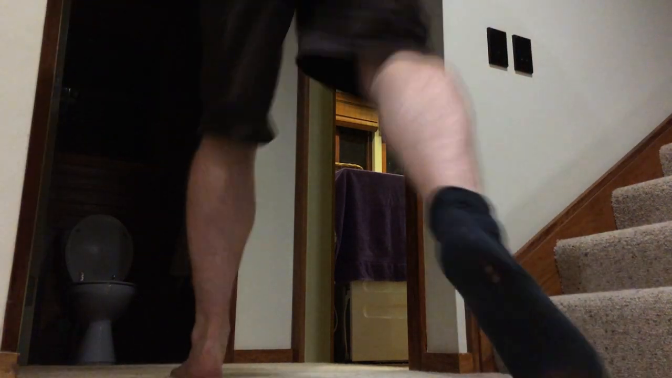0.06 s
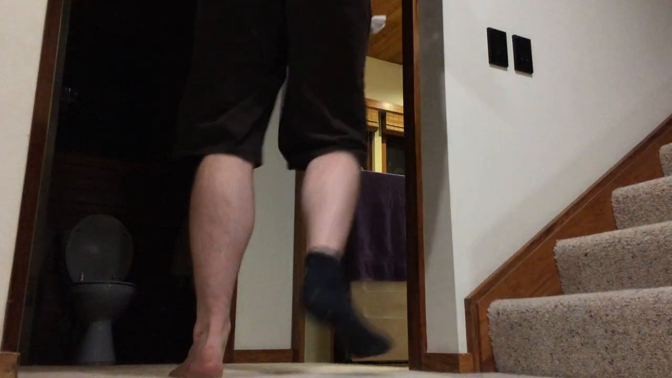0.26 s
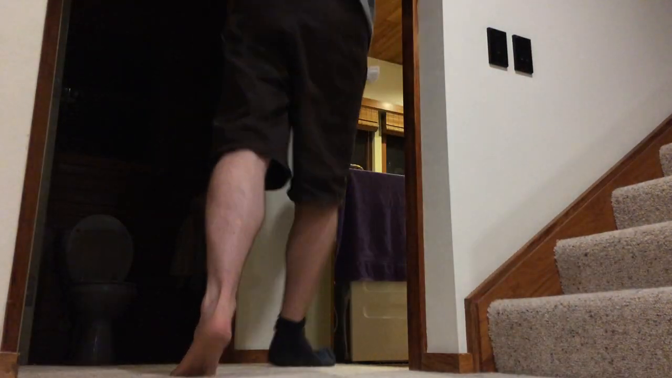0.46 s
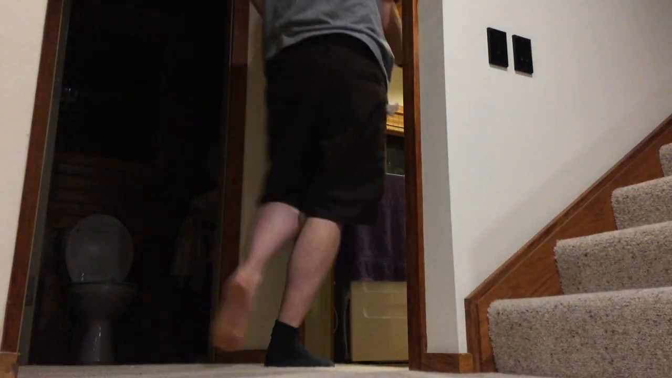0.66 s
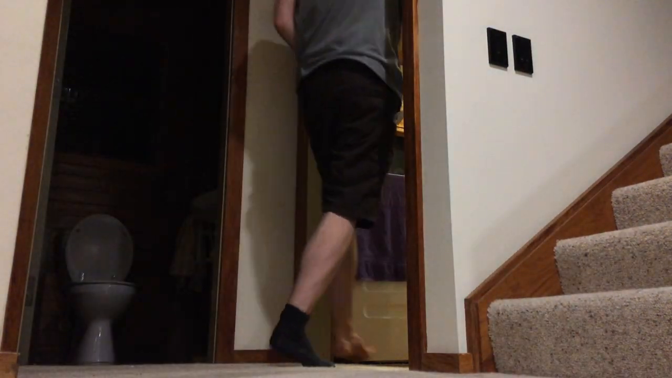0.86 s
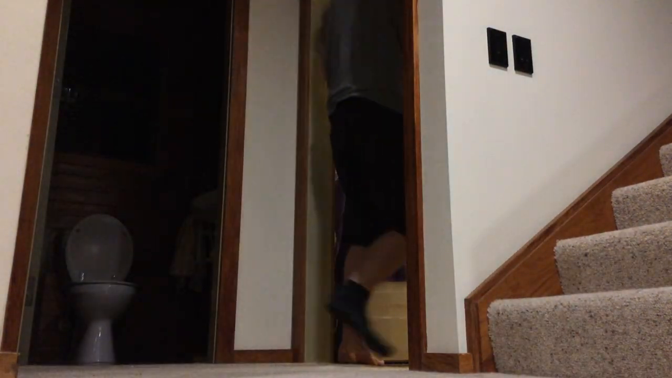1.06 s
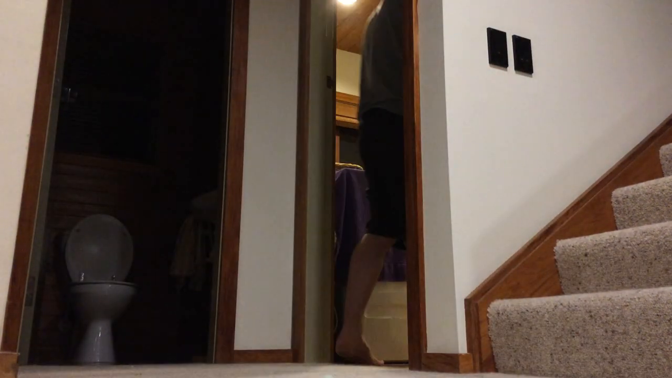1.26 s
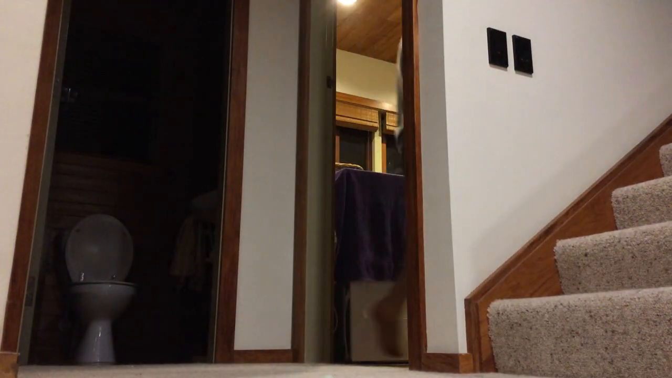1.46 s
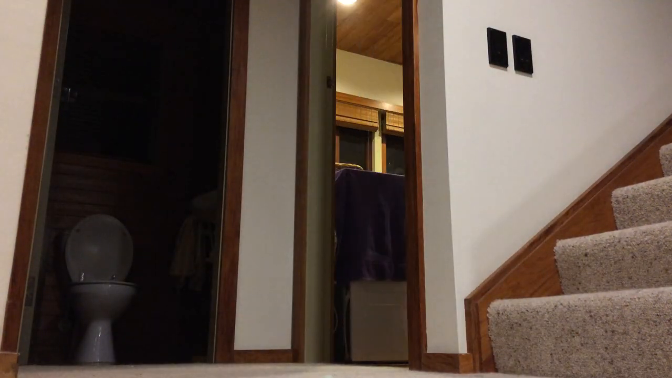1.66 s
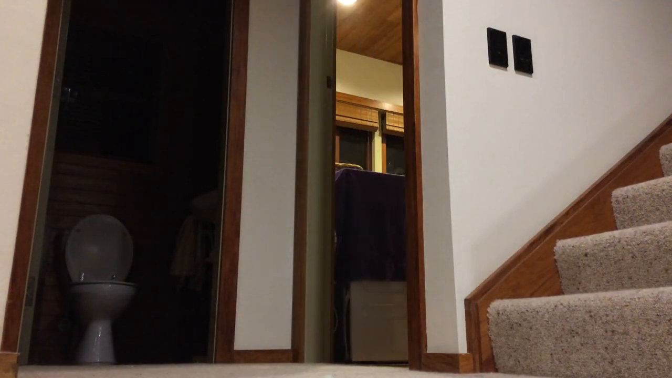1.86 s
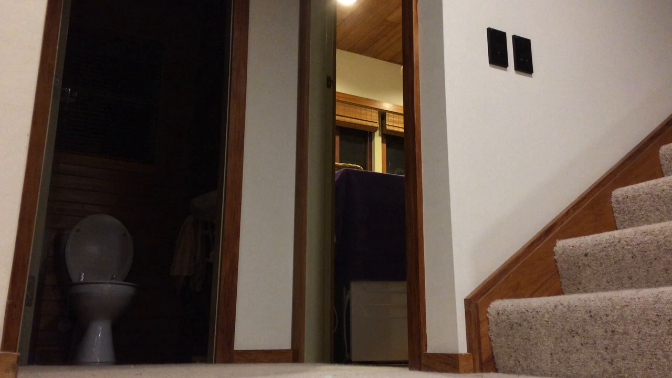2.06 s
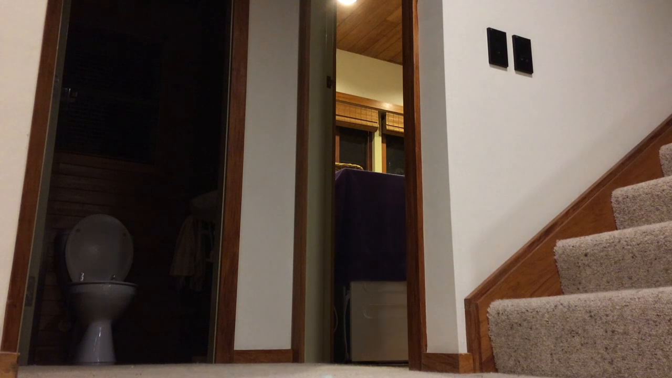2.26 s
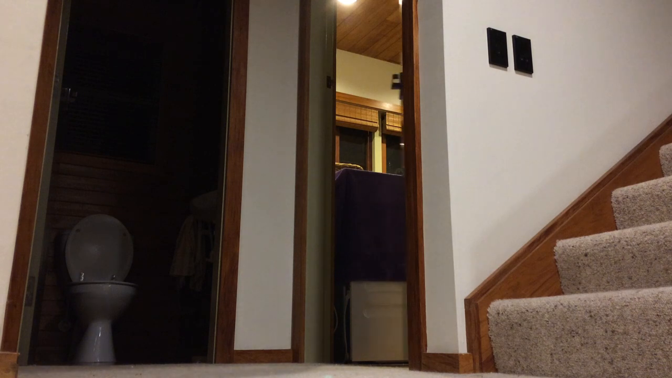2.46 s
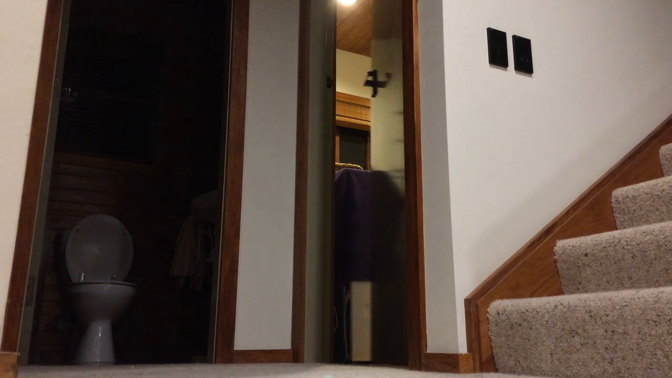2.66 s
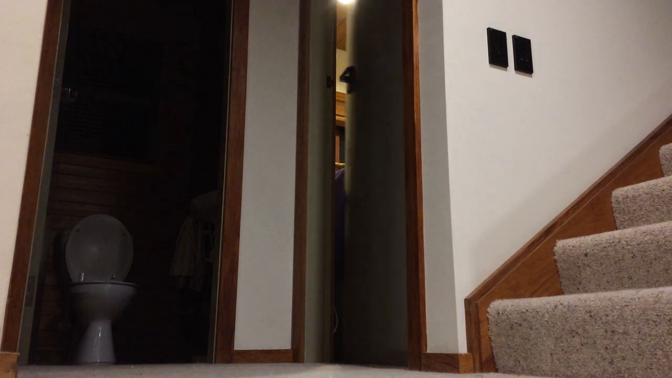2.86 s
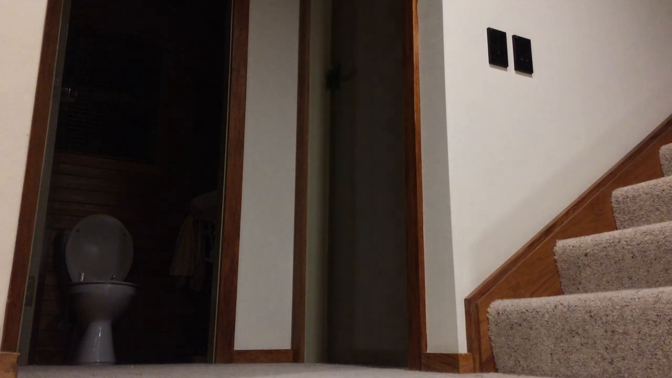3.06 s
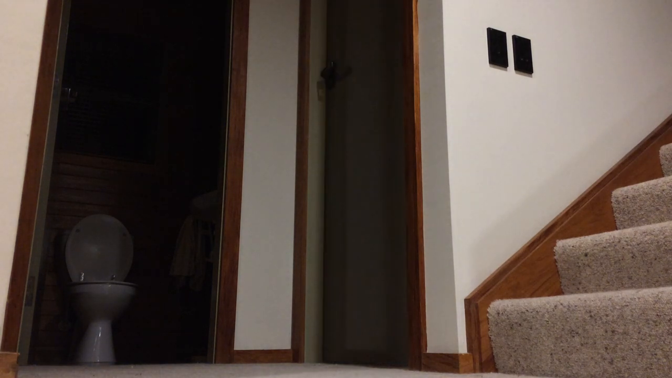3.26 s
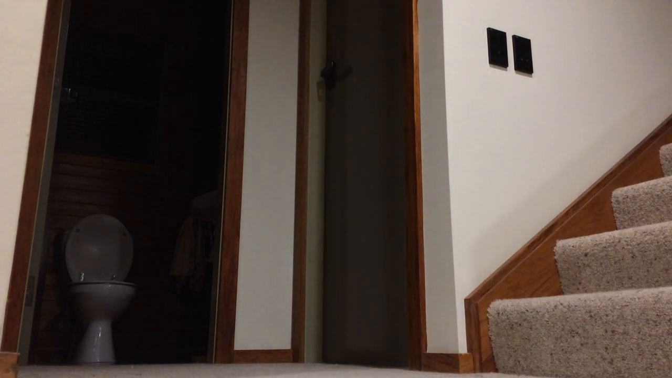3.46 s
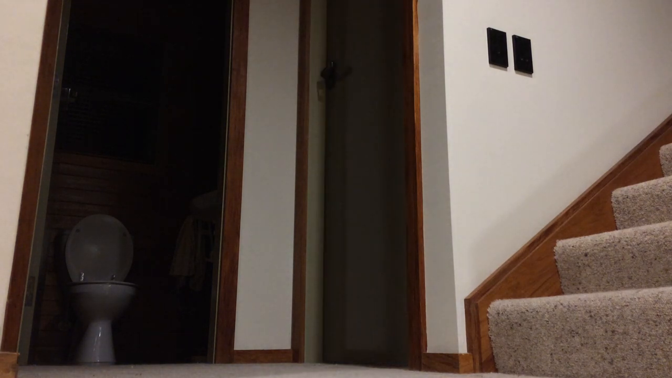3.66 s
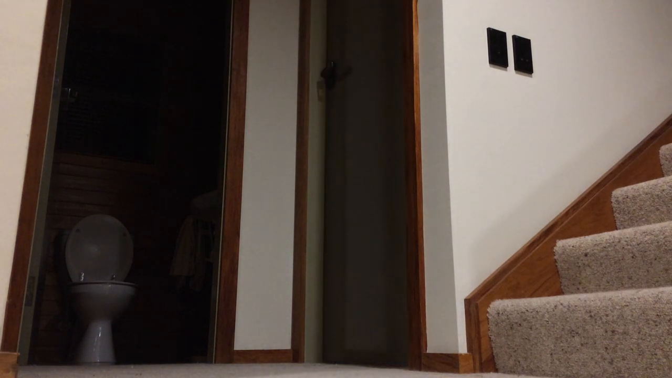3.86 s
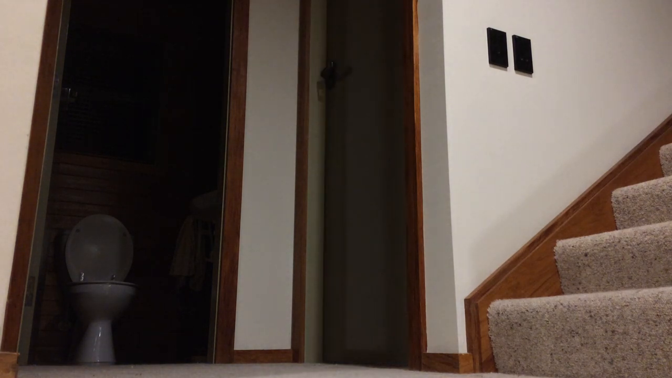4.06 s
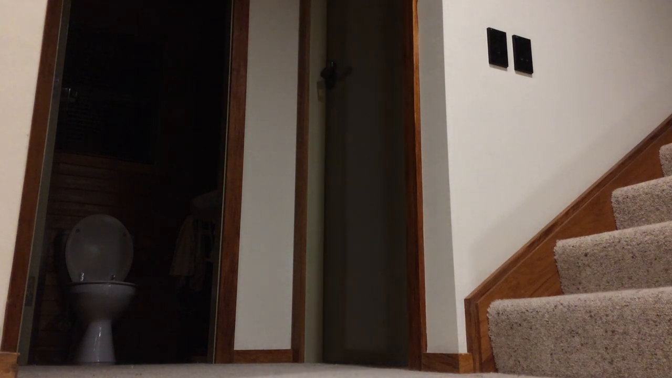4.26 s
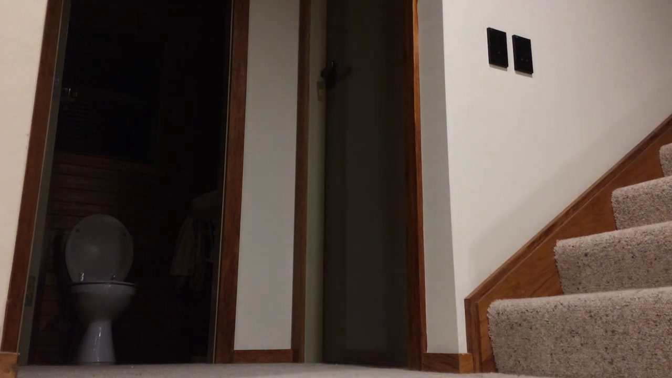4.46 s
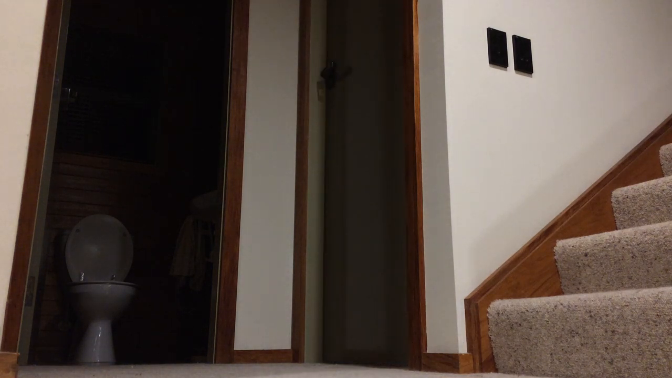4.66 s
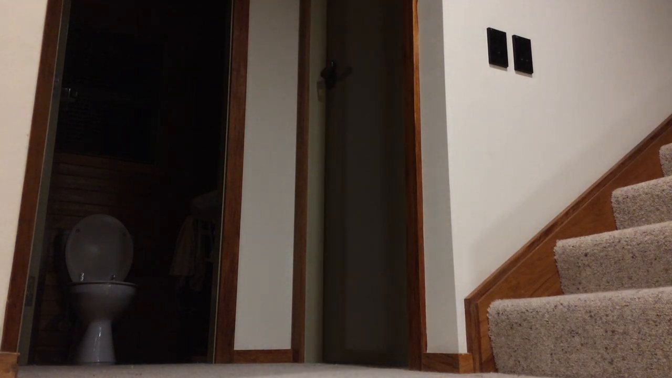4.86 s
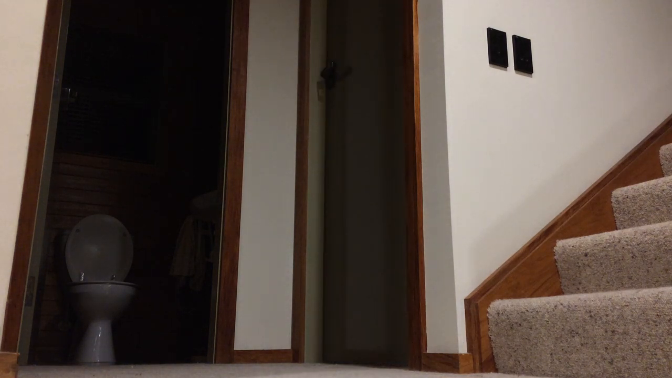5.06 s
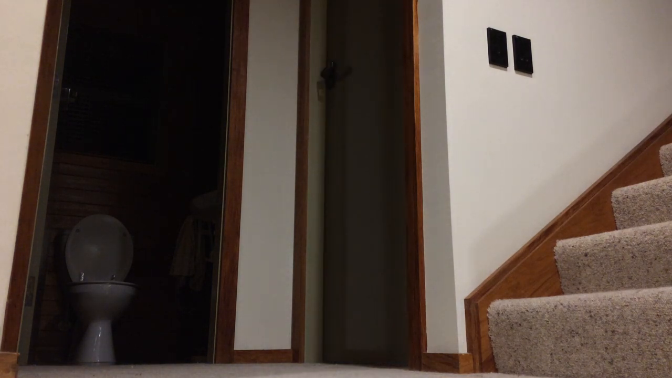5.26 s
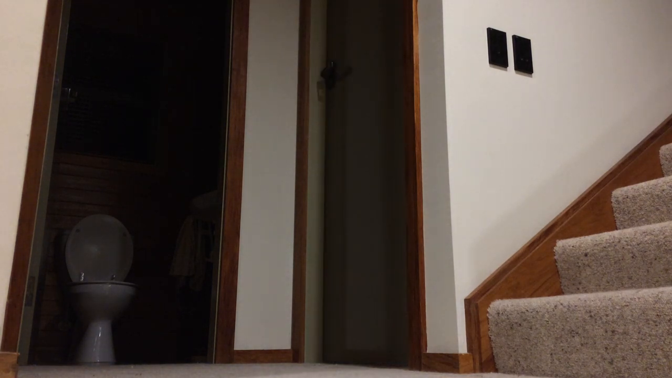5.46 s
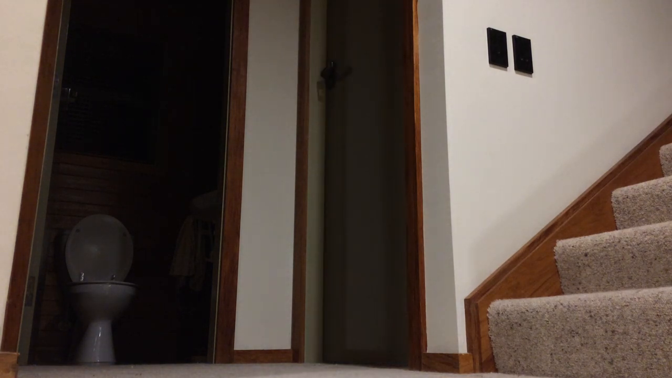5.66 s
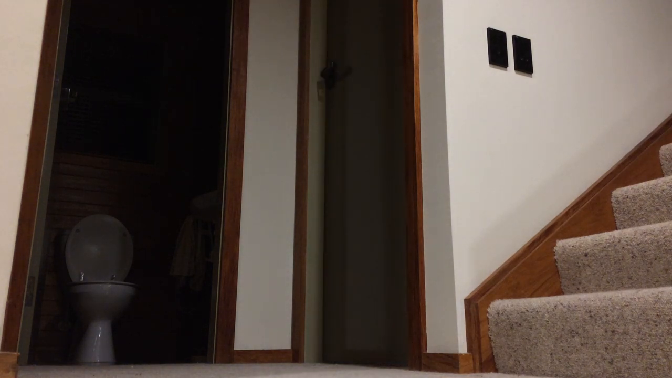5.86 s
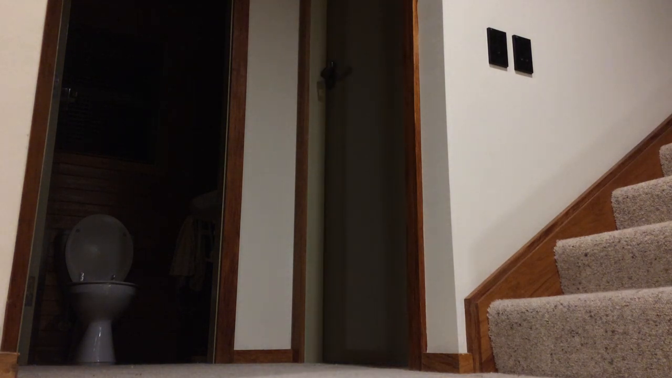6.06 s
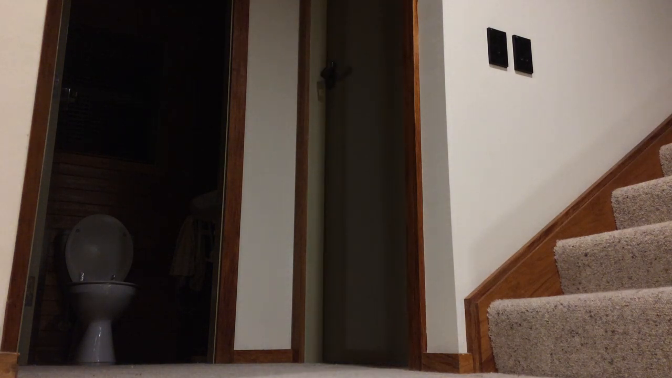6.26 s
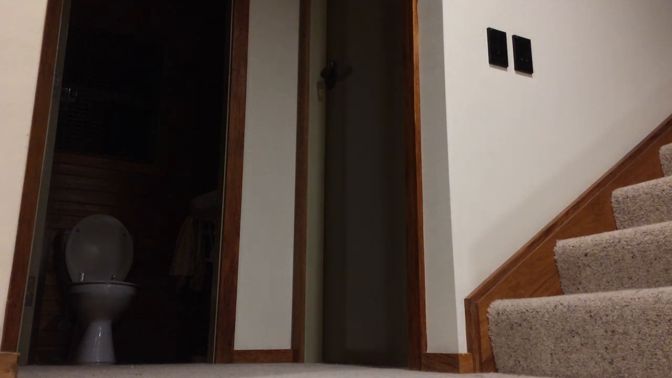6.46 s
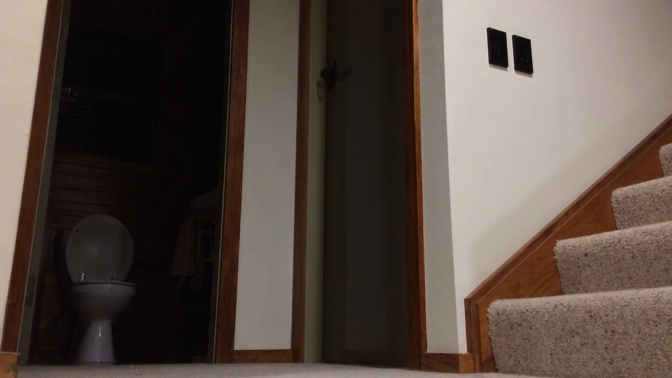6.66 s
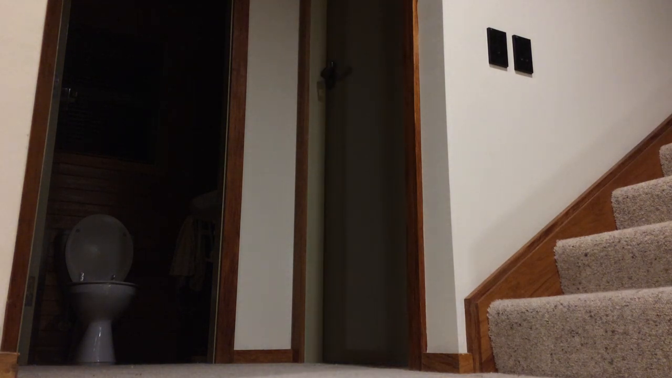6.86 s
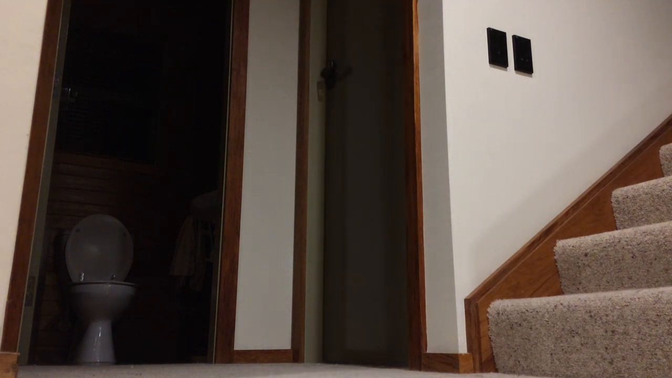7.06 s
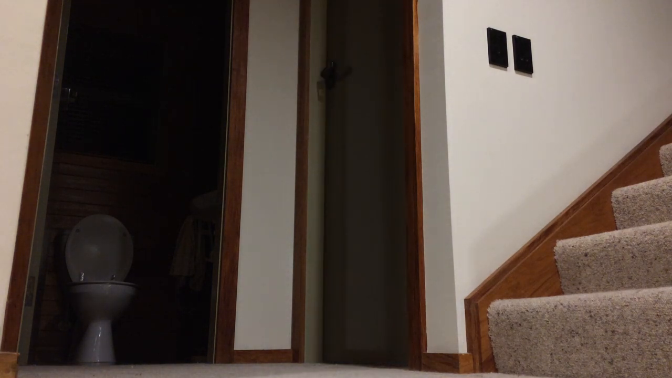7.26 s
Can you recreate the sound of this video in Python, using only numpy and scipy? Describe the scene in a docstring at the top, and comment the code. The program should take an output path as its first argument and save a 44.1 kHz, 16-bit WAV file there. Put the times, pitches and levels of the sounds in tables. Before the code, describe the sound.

Soft padded footsteps recede over carpet, a hinge hums faintly, then a wooden door shuts with a latch knock and deep boom, muffled steps continuing.

```python
"""A carpeted landing in a quiet house, heard from near the floor of the hall.
Someone in socks pads across, goes through a doorway and pushes the wooden door shut on a humming hinge.
The latch knocks on its strike plate, the leaf booms against the stop and the bolt snaps home; muffled
steps go on behind the door. Blows ring decaying sine modes over bursts of banded noise; friction,
rumble and the hiss of the house are coloured noise.
"""
import sys
import numpy as np
from scipy import signal
from scipy.fft import rfft, irfft, next_fast_len
from scipy.io import wavfile

SR = 44100
rng = np.random.default_rng(int(sys.argv[2]) if len(sys.argv) > 2 else 0)


def transcribe(signal):
    """Save signal, clipped to [-1, 1], as a 16-bit WAV file at the path in sys.argv[1]."""
    frames = np.atleast_2d(signal).T
    limited = np.clip(frames, -1, 1)
    pcm = np.round(limited * 32767).astype(np.int16)
    wavfile.write(sys.argv[1], SR, pcm)


N = 322371
TIME = np.arange(N) / SR  # seconds into the scene
AGE = np.arange(SR) / SR  # seconds since a blow
BAND_HZ = np.geomspace(30, 16000, 28)  # band centres, about a third of an octave apart


def undb(db):
    """Decibels to amplitude."""
    return 10 ** (np.asarray(db) / 20)


def at(points, hz):
    """Read a table at the given frequencies, straight lines over log frequency."""
    table_hz, value = np.transpose(points)
    return np.interp(np.log(hz + 1e-9), np.log(table_hz), value)


def unit(x):
    """Scale to rms 1."""
    return x / np.sqrt(np.mean(x ** 2))


def fall(t, t60):
    """Exponential decay that loses 60 dB in t60 seconds."""
    return np.exp(-np.log(1000) * t / t60)


def add(track, s, x):
    """Mix a sound into the track, starting at s seconds."""
    i = int(s * SR)
    track[i:i + len(x)] += x[:N - i]


def filtered_noise(gain_at):
    """White noise shaped by a gain over frequency, rms 1."""
    size = next_fast_len(N)
    spectrum = rfft(rng.standard_normal(size))
    gain = gain_at(np.fft.rfftfreq(size, 1 / SR))
    return unit(irfft(spectrum * gain, size)[:N])


def noise(tone):
    """Steady noise of a given colour, rms 1."""
    return filtered_noise(lambda hz: undb(at(tone, hz)))


def narrow(centre_hz, width_hz):
    """A rough tone: noise in one resonance, rms 1."""
    return filtered_noise(lambda hz: 1 / (1 + (2 * (hz - centre_hz) / width_hz) ** 2))


def band_noises():
    """Two seconds of unrelated noise in each band, for the bursts to draw on."""
    size = 2 * SR
    octaves = np.log2((np.fft.rfftfreq(size, 1 / SR) + 1e-9) / BAND_HZ[:, None])
    spacing = np.log2(BAND_HZ[1] / BAND_HZ[0])
    shape = np.sqrt(np.maximum(1 - np.abs(octaves) / spacing, 0))
    return irfft(rfft(rng.standard_normal((len(BAND_HZ), size))) * shape)


def burst(bank, band_db, t60, rise=0):
    """Countless close modes struck at once: each band builds up within a cycle or so and dies away."""
    start = rng.integers(bank.shape[1] - SR)
    out = np.zeros(SR)
    for band, hz, db, decay in zip(bank, BAND_HZ, band_db, t60 + 0 * BAND_HZ):
        if db <= np.max(band_db) - 50:  # too faint to matter
            continue
        t = AGE[:int(decay * SR * 4 / 3)]  # down to -80 dB
        build_up = 1 - np.exp(-(t / (rise + .5 / hz)) ** 2)
        shape = build_up * fall(t, decay)
        x = band[start:start + len(t)] * shape
        # every draw of noise gets the same energy
        out[:len(t)] += undb(db) * x * np.sqrt(np.sum(shape ** 2) / np.sum(x ** 2))
    return out


def power_db(power):
    """Band powers as dB, with total power 1."""
    return 10 * np.log10(power / power.sum())


def shares(tone):
    """Band levels in dB of a colour given per Hz, with total power 1."""
    return power_db(undb(at(tone, BAND_HZ)) ** 2 * BAND_HZ)


def hump(hz, octaves):
    """Band levels in dB of one broad resonance, with total power 1."""
    return power_db(np.exp(-.5 * (np.log2(BAND_HZ / hz) / octaves) ** 2) + 1e-18)


def muffled(top_hz):
    """Band levels in dB of a cushioned blow, which holds almost nothing above its top; total power 1."""
    ratio = BAND_HZ / top_hz
    return power_db(ratio ** 3 / (1 + ratio ** 15))


def ring(modes):
    """Impulse response of a set of modes; neighbours swing in opposite directions."""
    return sum((-1) ** k * undb(db) * np.sin(2 * np.pi * hz * AGE) * fall(AGE, t60)
               for k, (hz, db, t60) in enumerate(modes))


def swell(s, width_s):
    """A smooth rise and fall around a moment, top 1."""
    return np.exp(-((TIME - s) / width_s) ** 2)


def rub(tone):
    """Uneven friction: noise of a given colour whose level flutters."""
    flutter_db = 1.6 * noise([(5, -1.5), (30, -3), (90, -58.5)])
    return undb(flutter_db) * noise(tone)


# How long the hall rings. Each row: frequency in Hz, t60 in seconds.
HALL_T60 = [(60, 1.66), (130, 0.77), (300, 0.3068), (1000, 0.36), (3000, 0.3016), (7000, 0.26),
            (14000, 0.2452)]
# What the walls give back. Each row: frequency in Hz, level in dB.
HALL_TONE = [(60, -3), (300, 7), (1000, 0.5), (3000, 0), (7000, 1), (14000, -2)]


def in_hall(bank, band_db, t60, room_db, build_s):
    """A short crack followed by the hall's diffuse ring."""
    tail_db = band_db + room_db + at(HALL_TONE, BAND_HZ)
    crack = burst(bank, band_db, t60)
    return crack + burst(bank, tail_db, at(HALL_T60, BAND_HZ), build_s)


# Blows on the door. Each row: start in seconds, leaf ring in dB, time scale of the push in ms,
# place from 0 latch to 1 stop, wood crack in dB, metal crack in dB, crack t60 in seconds.
DOOR_BLOWS = [(3.04, -43, 2.7, 0.056, -50, -78, .07), (3.1273, -20.5, 1.06, 0, -19.5, -19, 0.058),
              (3.132, -33, .5, .4, -23, -22, .029), (3.172, -28, 2.3, 0.46, -23, -37, .055),
              (3.3231, -15.5, 2.5, 1, -27, -45.5, 0.07), (3.3317, -31, .5, .67, -22, -25.5, .03),
              (3.3362, -24.5, 0.31, 0.53, -15.5, -31, 0.075), (3.349, -21, 0.61, .94, -15.5, -35, .06),
              (3.3524, -27, 0.52, 0.88, -18.5, -23.5, 0.029)]
# The leaf in its frame. Each row: mode in Hz, dB struck at the latch, dB struck at the stop, t60 in seconds.
LEAF_MODES = [(75.82, -9, -14, 1), (102.7, -19.5, 0.5, 0.22), (131.5, -11, 2, 0.51),
              (152, -3.5, -3.5, 0.32), (181.5, -9.5, -8.5, 0.41), (215.5, -3, -10, .42),
              (257, -9, -15.5, .33), (286, -9, -2, .34), (334, -1.5, -3, 0.35), (359.3, -1, -5.5, 0.37),
              (434.7, -6.5, 3.5, 0.39), (516, -8, -14, 0.3), (510, -17.5, -4.5, 0.33),
              (583, -16.5, -11, 0.073), (765, -18, -17, .24), (805.7, -6, -13, 0.23),
              (882, -12.5, -8.5, 0.29), (966, -8.5, -1.5, 0.2), (1005, -13, -14, 0.22),
              (1070, -20.5, -1, .3), (1238, -23.5, -9, 0.22), (1284, -13, -17, .38),
              (1395, -15, -19.5, 0.19), (1826, -19, -12, 0.33)]
# The panel's stiff, quickly damped clack. Each row: mode in Hz, level in dB, t60 in seconds.
CLACK_MODES = [(345, 2, 0.081), (452, 0, 0.076), (850.3, 3, .03), (990, 7.5, 0.018), (1390, 3, .03),
               (1620, 2, .025)]
# The steel latch and handle. Each row: mode in Hz, relative level in dB, t60 in seconds.
LATCH_MODES = [(2495, -16, 0.22), (2925, -12.5, .24), (3046, -19.5, .2), (3460, -17.5, .2),
               (3810, -16, .19), (4548, -2, .2), (4610, -7, .13), (5230, -18.5, 0.11), (6900, -22, .22),
               (7160, -21.5, .2), (9400, -24, .2), (9450, -21, .17), (11040, -21, .19)]
# Colours of the wood and metal contacts. Each row: frequency in Hz, level in dB per Hz.
WOOD_COLOUR = [(50, -12.5), (120, -4), (330, 0), (520, -1.5), (700, -7.5), (1000, -4.5), (1500, -14),
               (2200, -17.5), (4000, -28), (8000, -36.5), (15000, -48)]
METAL_COLOUR = [(100, -16), (400, -2.5), (1300, 4), (2000, -3.5), (3000, 0.5), (4500, -1), (5600, -5.5),
                (7000, -7.5), (8200, -8), (10000, -5), (12500, -11.5), (15000, -12)]
LATCH_RING_DB = -7.5  # relative to the metal crack
SEATED_DB = -8  # the bolt rings less once it sits in the strike plate
KNOCK_ROOM_DB = -11  # the hall's answer to a blow


def door(bank):
    """Each blow rings the leaf and the latch and cracks at the contact; a longer push dulls the leaf."""
    out = np.zeros(N)
    latch, clack = ring(LATCH_MODES), ring(CLACK_MODES)
    # where the leaf is struck decides which of its modes speak
    at_latch = ring([(hz, db, t60) for hz, db, _, t60 in LEAF_MODES])
    at_stop = ring([(hz, db, t60) for hz, _, db, t60 in LEAF_MODES])
    for s, leaf_db, push_ms, place, wood_db, metal_db, t60 in DOOR_BLOWS:
        push = AGE * np.exp(-2 * np.pi * AGE / (push_ms / 1000))
        leaf = clack + at_latch + place * (at_stop - at_latch)
        add(out, s, undb(leaf_db) * signal.fftconvolve(leaf, push / push.sum())[:SR])
        add(out, s, undb(metal_db + LATCH_RING_DB + SEATED_DB * place) * latch)
        wood = undb(wood_db + shares(WOOD_COLOUR))
        metal = undb(metal_db + shares(METAL_COLOUR))
        contact_db = 20 * np.log10(np.hypot(wood, metal))
        add(out, s, in_hall(bank, contact_db, t60, KNOCK_ROOM_DB, build_s=0.0086))
    return out


# The wall sways as the latch strikes and as the leaf meets the stop. Each row: start in seconds, level in dB.
WALL_BOOMS = [(3.148, -20), (3.3533, -3)]
# A boom dies fast in the wall and slowly in the shut-in air. Each row: level in dB, t60 in seconds.
BOOM_DECAY = [(1, .21), (-23, 0.66), (-34.5, 3.8)]
BOOM_HZ, BOOM_RISE_S = 77.1, 0.0098
SWAY_HZ, SWAY_DB, SWAY_T60_S = 46, -36, .6  # the wall's lowest mode, level relative to the boom


def wall():
    """The wall's deep boom: regular swings at first, then uneven beating as the shut-in air takes over."""
    out = np.zeros(N)
    regular = np.exp(-(TIME / .09) ** 2)
    attack = 1 - np.exp(-(TIME / BOOM_RISE_S) ** 2)
    decay = sum(undb(db) * fall(TIME, t60) for db, t60 in BOOM_DECAY)
    sway = ring([(SWAY_HZ, SWAY_DB, SWAY_T60_S)])
    for s, db in WALL_BOOMS:
        steady = regular * np.cos(2 * np.pi * BOOM_HZ * TIME)
        beating = 0.2 * np.sqrt(1 - regular ** 2) * narrow(76, width_hz=22)
        add(out, s, undb(db) * attack * decay * (steady + beating))
        add(out, s, undb(db) * sway)
    return out


# The hinge hums as the leaf starts to swing. Each row: time in seconds, level in dB.
HINGE_HUM = [(1.92, -84.5), (2.03, -67.5), (2.12, -66.5), (2.22, -57.5), (2.36, -59.5), (2.44, -66),
             (2.52, -63.5), (2.62, -97)]
# Colour of the swinging leaf's rumble. Each row: frequency in Hz, level in dB per Hz.
LEAF_RUMBLE = [(40, -14), (110, 6), (190, 0), (300, -6.5), (600, -54)]
HINGE_HZ = 378.7  # mean pitch of the hum
HINGE_ROUGH = 0.49  # share of the hum's power that is ragged friction
SWEEP_DB, SWEEP_RUMBLE_DB = -11.5, 2  # carpet brush and leaf rumble, relative to the hinge


def swinging():
    """As the door swings the hinge hums, the leaf rumbles and its foot brushes the carpet."""
    effort = undb(np.interp(TIME, *np.transpose(HINGE_HUM), left=-np.inf, right=-np.inf))
    waver_hz = 5 * noise([(5, 0), (20, -5.5), (60, -59)])
    tone = np.sqrt(2) * np.sin(2 * np.pi * np.cumsum(HINGE_HZ + waver_hz) / SR)
    ragged = narrow(HINGE_HZ, width_hz=80)
    hum = np.sqrt(1 - HINGE_ROUGH) * tone + np.sqrt(HINGE_ROUGH) * ragged
    brush = undb(SWEEP_DB) * rub(SCUFF_COLOUR)
    rumble = undb(SWEEP_RUMBLE_DB) * noise(LEAF_RUMBLE)
    return effort * (hum + brush + rumble)


# Footfalls. Each row: start in seconds, heel in dB, heel top in Hz, build-up in seconds, weight in dB,
# heel-to-weight delay in seconds, sock scuff in dB.
STEPS = [(.117, -32, 124, .002, -22.5, 0.0089, -57), (.56, -52.5, 183, 0.014, -62.5, .03, -58.5),
         (1.011, -45.5, 94, 0.0024, -55, 0.0045, -57.5), (1.42, -62, 176, 0.0066, -56, .04, -58.5),
         (1.846, -55, 198, 0.0056, -42.5, 0.036, -71), (2.229, -47.5, 183, 0.018, -63, .04, -60.5),
         (2.625, -52, 137, 0.011, -57.5, 0.029, -77), (3.714, -43, 109, 0.019, -33.5, 0.033, -92),
         (4.385, -42, 186.8, 0.024, -35, .07, -81), (4.905, -42.5, 181.1, 0.036, -32.5, 0.071, -93),
         (5.335, -42.5, 90.1, .01, -34, 0.054, -92), (5.978, -33, 134.9, 0.024, -31.5, 0.019, -92)]
# Colour of a rub on the carpet. Each row: frequency in Hz, level in dB per Hz.
SCUFF_COLOUR = [(100, -3.5), (350, 8), (700, -0.5), (1100, -3), (2000, -10.5), (4000, -24), (9000, -29),
                (15000, -30)]
HEEL_T60_S, SCUFF_T60_S = 0.31, .49
JOIST_HZ, JOIST_RISE_S, JOIST_T60_S = 64.3, 0.0067, 0.18  # the floor gives under the body's weight


def footsteps(bank):
    """The heel thuds on the boards and scuffs the carpet, then the weight sinks into the joists."""
    out = np.zeros(N)
    for s, heel_db, top_hz, rise, weight_db, delay, scuff_db in STEPS:
        add(out, s, burst(bank, heel_db + muffled(top_hz), HEEL_T60_S, rise))
        add(out, s, burst(bank, scuff_db + shares(SCUFF_COLOUR), SCUFF_T60_S, rise))
        add(out, s + delay, burst(bank, weight_db + muffled(JOIST_HZ), JOIST_T60_S, JOIST_RISE_S))
    return out


# Colours of the clothes and of the boards underfoot. Each row: frequency in Hz, level in dB per Hz.
CLOTH_COLOUR = [(800, -6), (2000, 1.5), (5000, -1), (9000, -4), (15000, -7)]
BOARDS_COLOUR = [(25, -5.5), (50, -2), (110, 0), (170, -4), (260, -16), (600, -39.5)]
# each footfall is followed by the swing of the other leg
SWING_LAG_S, SWING_WIDTH_S, SWING_DB = 0.17, .13, 3
# level between swings at the start, and its fall as the walker moves off
BRUSH_DB, BRUSH_FALL_DB_PER_S = -68, 4
CLOTH_DB, CLOTH_FALL_DB_PER_S, CLOTH_SWING_DB = -72.5, 6, -1.5
BOARDS_DB, BOARDS_FALL_DB_PER_S = -61.5, 4.5


def walker():
    """Soles and boards swell with each leg swing, cloth hiss dips; all fade until the door shuts them out."""
    swing = sum(swell(step[0] + SWING_LAG_S, SWING_WIDTH_S) for step in STEPS)
    soles_db = BRUSH_DB - BRUSH_FALL_DB_PER_S * TIME + SWING_DB * swing
    clothes_db = CLOTH_DB - CLOTH_FALL_DB_PER_S * TIME + CLOTH_SWING_DB * swing
    boards_db = BOARDS_DB - BOARDS_FALL_DB_PER_S * TIME + SWING_DB * swing
    soles = undb(soles_db) * rub(SCUFF_COLOUR)
    clothes = undb(clothes_db) * rub(CLOTH_COLOUR)
    boards = undb(boards_db) * noise(BOARDS_COLOUR)
    door_open = TIME < DOOR_BLOWS[-1][0]
    return (soles + clothes + boards) * door_open


# Crisp clicks from joints, boards and the handle.
# Each row: start in seconds, level in dB, pitch in Hz, t60 in seconds, room in dB relative to the click.
CLICKS = [(0.122, -37, 330, 0.031, -26), (0.3462, -31, 755, 0.0071, -30), (.3617, -20.5, 760, 0.0061, -41),
          (.786, -36, 430, .014, -30), (0.8928, -36, 9100, 0.002, -25.5),
          (3.043, -38.5, 1030, 0.028, -21.5)]


def crisp_clicks(bank):
    """Each click is one softly started, quickly damped mode with a little room around it."""
    out = np.zeros(N)
    for s, db, hz, t60, room_db in CLICKS:
        cushion = 1 - np.exp(-(2 * AGE * hz) ** 2)
        add(out, s, cushion * ring([(hz, db, t60)]))
        add(out, s, burst(bank, db + room_db + hump(hz, octaves=.5), at(HALL_T60, hz), rise=.003))
    return out


# Small blurred creaks and knocks. Each row: start in seconds, level in dB, centre in Hz, width in octaves.
SOFT_TICKS = [(.786, -63.5, 900, 0.8), (1.014, -65.5, 8200, 0.54), (1.306, -61.5, 1680, .9),
              (1.593, -58, 3000, 4.1), (1.838, -68.5, 5030, 1.9), (1.927, -71, 1100, 1),
              (2.231, -63, 1040, 0.44), (2.615, -66.5, 1460, 2), (2.95, -67.5, 1200, .7),
              (3.039, -57.5, 1991, 0.41), (6.692, -65.5, 2800, 0.89)]
TICK_T60_S, TICK_ROOM_DB = .09, -0.65


def soft_ticks(bank):
    """Small blurred creaks and knocks: short noise bursts nearly matched by the hall's ring."""
    out = np.zeros(N)
    for s, db, hz, octaves in SOFT_TICKS:
        add(out, s, in_hall(bank, db + hump(hz, octaves), TICK_T60_S, TICK_ROOM_DB, build_s=0.0066))
    return out


# Faint rustles once the door is shut. Each row: middle in seconds, level in dB, half length in seconds.
RUSTLES = [(6.735, -70.5, 0.072), (7.028, -73.5, 0.059), (7.29, -73, 0.079)]
# Faint thin squeaks. Each row: middle in seconds, level in dB, pitch in Hz, width in Hz, half length in seconds.
SQUEAKS = [(1.47, -70, 1020, 150, 0.084), (6.72, -77, 6500, 300, 0.061), (7.289, -74, 6140, 500, 0.038)]


def stirring():
    """Rustles are swells of friction noise; squeaks are swells of narrow-band noise."""
    rustles = sum(undb(db) * swell(s, half_s) for s, db, half_s in RUSTLES) * rub(SCUFF_COLOUR)
    squeaks = sum(undb(db) * swell(s, half_s) * narrow(hz, width_hz)
                  for s, db, hz, width_hz, half_s in SQUEAKS)
    return rustles + squeaks


# Colour of the still house. Each row: frequency in Hz, level in dB per Hz.
QUIET_COLOUR = [(20, -14), (45, 0), (65, -2.5), (85, 1.5), (120, -2.5), (170, -10.5), (203, -7), (255, -16),
                (350, -15.5), (700, -23), (1050, -25.5), (1600, -28), (3000, -30), (15000, -35.5)]
QUIET_DB = -67.5


def still_house():
    """Steady low rumble with a faint hiss on top."""
    return undb(QUIET_DB) * noise(QUIET_COLOUR)


def scene():
    """All sources over the low rumble and hiss of a still house."""
    bank = band_noises()
    blows = door(bank) + wall() + footsteps(bank)
    small = crisp_clicks(bank) + soft_ticks(bank) + stirring()
    return (blows + swinging() + walker() + small + still_house())[None]


def record(dry):
    """The microphone loses the deepest bass and cuts off steeply at the top."""
    thin = signal.sosfilt(signal.butter(2, 28, "highpass", fs=SR, output="sos"), dry)
    top_hz = 15300
    return signal.sosfilt(signal.ellip(10, .2, 80, top_hz, fs=SR, output="sos"), thin)


dry = scene()
out = record(dry)
transcribe(out)
```